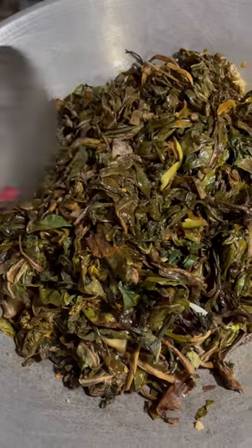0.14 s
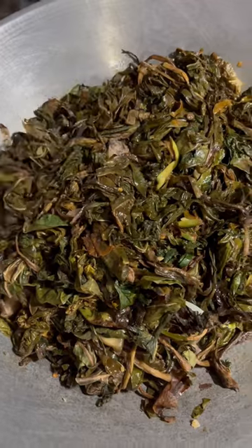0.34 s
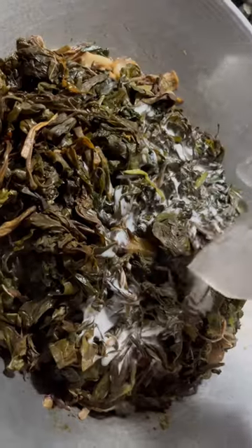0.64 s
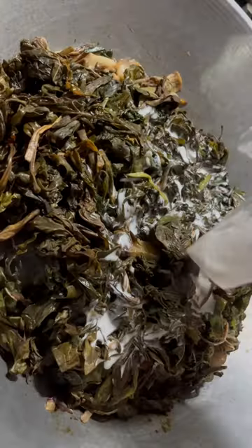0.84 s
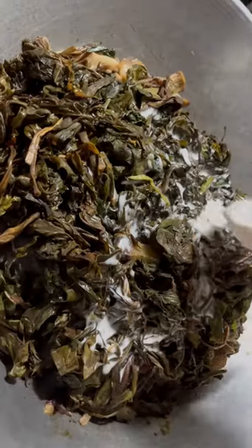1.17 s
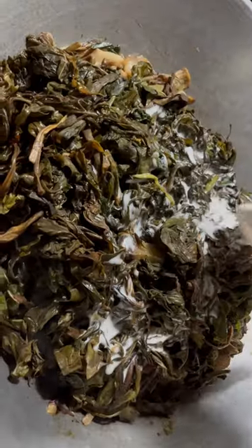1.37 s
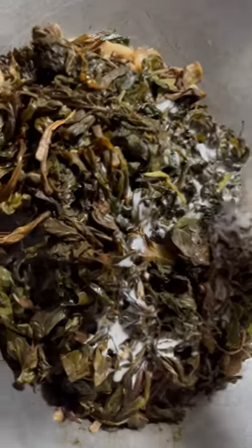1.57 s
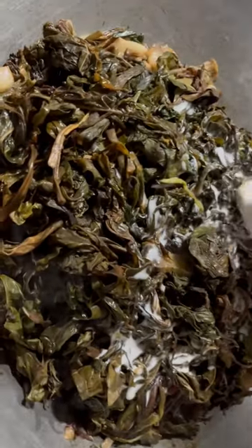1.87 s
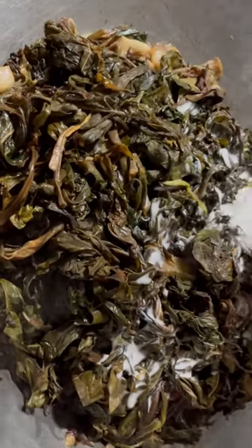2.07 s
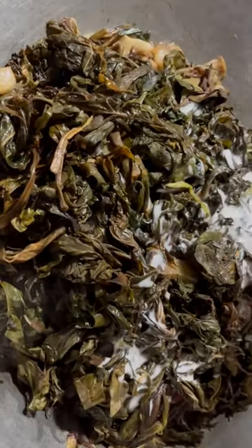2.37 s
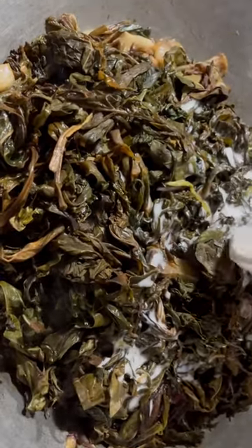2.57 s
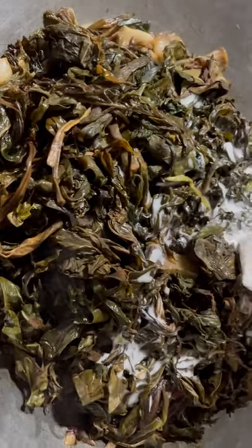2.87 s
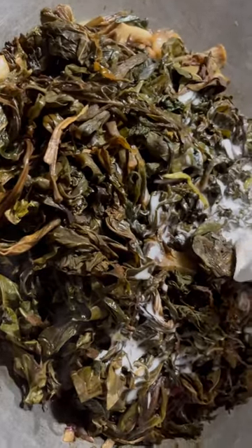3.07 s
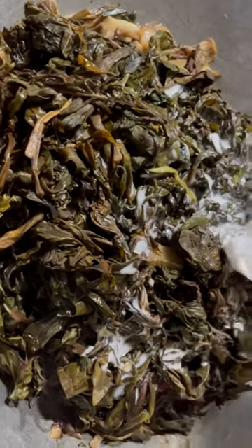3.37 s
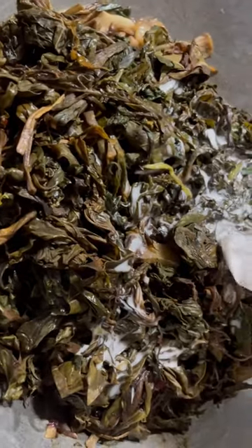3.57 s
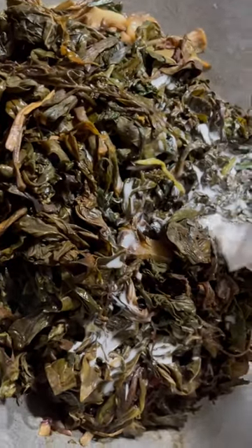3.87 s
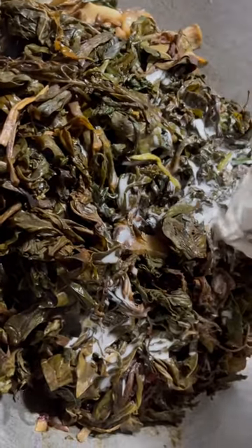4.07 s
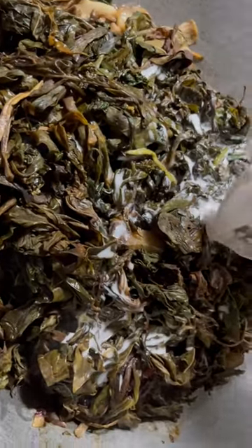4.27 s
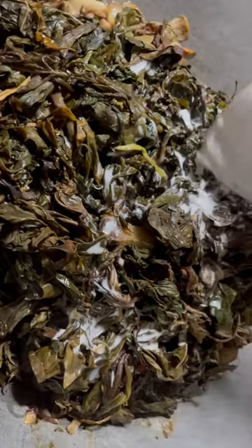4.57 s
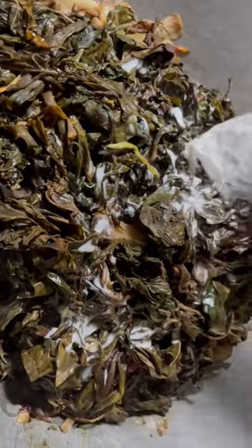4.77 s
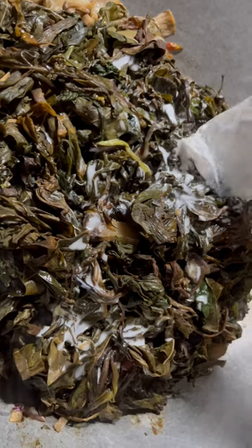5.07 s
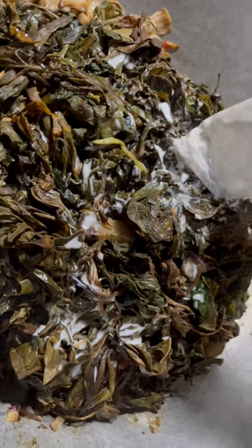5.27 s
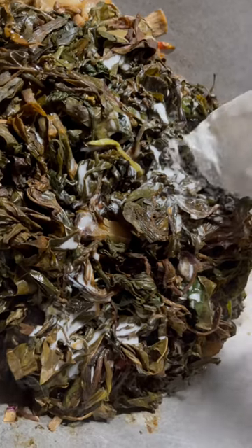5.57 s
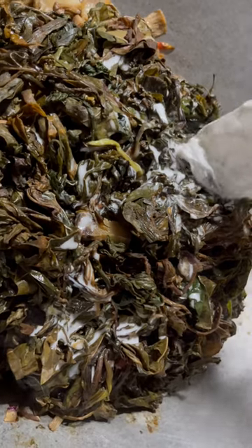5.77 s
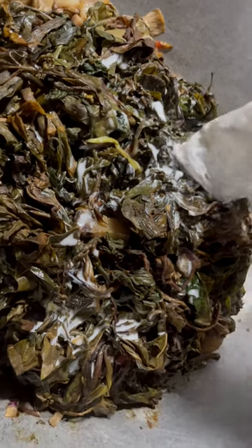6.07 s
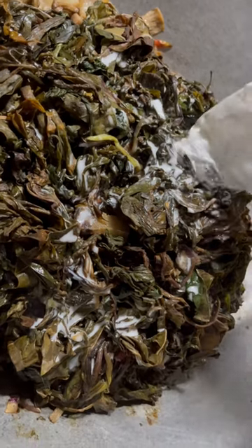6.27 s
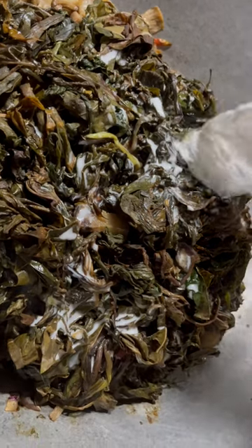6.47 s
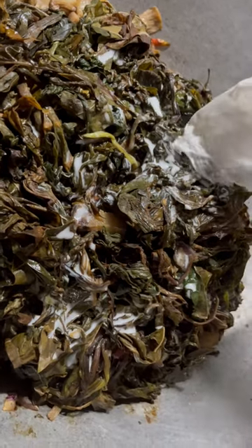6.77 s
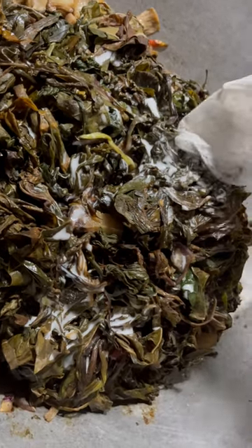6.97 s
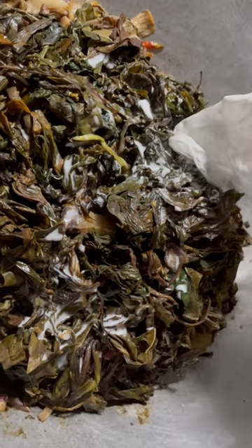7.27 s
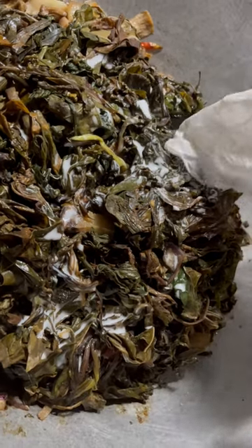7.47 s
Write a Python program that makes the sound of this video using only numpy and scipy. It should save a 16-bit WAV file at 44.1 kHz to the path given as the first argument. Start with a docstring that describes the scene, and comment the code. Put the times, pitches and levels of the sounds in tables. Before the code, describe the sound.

Chopped wet greens fry in a metal pan, close below one microphone in a quiet kitchen, equal in both channels. From 0 to 7.6 s a bright, mostly high sizzle continues: fine fizz, snapping bubbles, faint tiny ringing tones and smooth hiss, peppered with sharp dry oil spits. Very faint low rumble and mains hum lie beneath. Near 0.1 s the pan bumps softly with a faint utensil touch; a firmer touch and thud follow at 0.64 s. Low, soft bumps come around 2.1 and 2.5 s. The bubbling flares briefly near 0.9, 3.1, 3.6, 3.9 and 4.8 s, with short dips near 2.1 and 5 s. After a dull bump at 4.7 s, a short tap comes at 5.3 s and another bump at 6 s. The loudest, damped metallic double knock lands at 6.7 s, a faint touch at 7.3 s, and the frying ends slightly weaker, still going.

```python
"""Chopped greens fry in a metal pan in a quiet kitchen, one microphone close above, for 7.6 s.
From the start tiny bubbles fizz, larger ones snap and faint short tones shimmer over hiss, low rumble
and mains hum, made from random clicks, noise and sines; oil spits, band-limited pulses, run throughout.
Soft pan bumps and light utensil touches, resonated noise, begin within the first tenth of a second.
The frying flares and sinks briefly and ends a little weaker; the loudest touch comes near 6.7 s."""
import sys
import numpy as np
from scipy import signal
from scipy.fft import rfft, irfft
from scipy.io import wavfile
from scipy.ndimage import uniform_filter1d

SR = 44100
rng = np.random.default_rng(int(sys.argv[2]) if len(sys.argv) > 2 else 0)


def transcribe(u):
    """Save the signal u as a 16-bit wav file named by the first command-line argument.

    u: samples, shape (n,) or (channels, n), limited to [-1, 1]; the rate is SR.
    q: integer samples, one column per channel.
    """
    v = np.clip(np.atleast_2d(u).T, -1, 1)
    q = np.round(v * 32767).astype(np.int16)
    wavfile.write(sys.argv[1], SR, q)


N = 336483
TIME = np.arange(N) / SR  # seconds

# colour of the sizzle, relative density: pitch_hz, level_db (per Hz)
SIZZLE_COLOUR = [(200, -50.5), (500, -35.5), (800, -29), (1300, -24.5), (2000, -18), (2500, -16.5),
                 (3100, -11), (4100, -6), (5100, 0.5), (5800, 0.4), (6800, 2), (9500, 1.5), (11800, 2.5),
                 (15500, 0)]


def from_db(db):
    """Decibels to gain."""
    return 10 ** (np.asarray(db) / 20)


def rms_one(x):
    """Scale to unit rms."""
    return x / np.sqrt(np.mean(x ** 2) + 1e-20)


def drift(rate):
    """Smooth chance with spread 1 that changes about `rate` times a second."""
    step = 20  # samples between the slow random values
    r = np.exp(-2 * np.pi * rate * step / SR)
    noise = rng.standard_normal(N // step + 2002)
    slow = signal.lfilter([1], [1, -2 * r, r * r], noise)[2000:]  # drop the filter's start-up
    return np.interp(np.arange(N) / step, np.arange(len(slow)), rms_one(slow))


def colour(x, spectrum):
    """Causal (minimum-phase) filter with the given spectrum, so clicks stay sharp; rms 1."""
    size = 8192
    hz, level_db = np.transpose(spectrum)
    grid = np.maximum(np.arange(size // 2 + 1) * SR / size, 1)
    gain = from_db(np.interp(np.log(grid), np.log(hz), level_db))
    # folding the cepstrum forward in time gives minimum phase
    cepstrum = irfft(np.log(gain))
    cepstrum[1:size // 2] *= 2
    cepstrum[size // 2 + 1:] = 0
    impulse = irfft(np.exp(rfft(cepstrum)))
    return rms_one(signal.fftconvolve(x, impulse)[:N])


def resonate(x, hz, width_hz):
    """One resonance with gain 1 on top."""
    r = np.exp(-np.pi * width_hz / SR)
    feed = np.array([1, 0, -1]) * (1 - r * r) / 2
    back = [1, -2 * r * np.cos(2 * np.pi * hz / SR), r * r]
    return signal.lfilter(feed, back, x + 1e-18)


def cut(x, hz, kind, order=2):
    """Butterworth low- or high-pass."""
    sos = signal.butter(order, min(hz, .45 * SR), kind, fs=SR, output="sos")
    return signal.sosfilt(sos, x + 1e-18)


def swells(rows):
    """Smooth bell-shaped changes of level, in dB over time."""
    return sum(db * np.exp(-(2 * (TIME - s) / length) ** 2) for s, length, db in rows)


def flurries(rate, depth_db):
    """Wet spots flare up and die within hundredths of a second; the local mean rate stays put."""
    flare = from_db(depth_db * drift(rate))
    return flare / uniform_filter1d(flare, size=SR // 9)


def bursts(per_s, spread_db, limit):
    """Bubbles burst at random moments: many small, few large."""
    sizes = from_db(spread_db * np.minimum(rng.exponential(1, N), limit))
    return sizes * (rng.random(N) < per_s / SR)


def fizz(flurry, per_s, cycles, count=20):
    """Tiny bubbles of all sizes, ringing briefly at their own pitch; per_s is the rate at 8 kHz."""
    out = 0
    for k, hz in enumerate(np.geomspace(600, 16000, count)):
        clicks = bursts(per_s * hz / 8000 * flurry, spread_db=1.0, limit=4.5)
        ringing = rms_one(resonate(clicks, hz, hz / cycles))
        out = out + (-1) ** k * np.sqrt(hz) * ringing
    return colour(out, SIZZLE_COLOUR)


def crackle(flurry, per_s):
    """Larger bubbles snap open: single sharp pressure pulses."""
    snaps = bursts(per_s * flurry, spread_db=2.5, limit=4.6)
    return colour(cut(snaps, 230, "high"), SIZZLE_COLOUR)


def shimmer(per_s, cycles, spread_db, count=6000):
    """Short faint tones at random pitches, each rising slightly and dying in hundredths of a second."""
    out = np.zeros(N + 2048)
    age = np.arange(2048) / SR
    for when, pitch, weakness, damping in rng.random((count, 4))[:int(per_s * N / SR)]:
        hz = 1200 + 14500 * pitch
        life = min(cycles * (.5 + damping) / hz, .012)  # decay time in s, at most 12 ms
        rise = 1 + 0.0014 * np.minimum(age / life, 6)
        tone = np.sin(2 * np.pi * hz * age * rise) * np.exp(-age / life)
        level = from_db(-spread_db * np.log(max(weakness, .03))) / np.sqrt(life)
        at = int(when * N)
        out[at:at + len(age)] += level * tone
    return colour(out[:N], SIZZLE_COLOUR)


def hiss():
    """The bursts under the leaves and their echoes from the walls merge into a smooth hiss."""
    return colour(rng.standard_normal(N), SIZZLE_COLOUR)


def sizzle():
    """All four layers follow the frying; flares lift mostly the coarse bubbling below 4 kHz."""
    # how hard the pan fries; it eases as the greens dry: time_s, level_db
    frying_level = [(0, 0.5), (1.1, -0.3), (1.7, -0.6), (2.3, -0.4), (3.1, -0.8), (4.1, 0), (5.1, -1),
                    (6.2, -1.5), (6.8, -0.6), (7.63, -1.2)]
    # juice reaches the hot metal and the bubbling flares up: centre_s, length_s, rise_db
    flares = [(0.67, 0.026, 1), (0.88, 0.043, 2.5), (3.08, 0.045, 2.5), (3.57, 0.11, 2.3), (3.9, 0.11, 2),
              (4.8, 0.052, 3.5), (6.9, 0.052, 2), (7.3, 0.11, 1.5)]
    # the sizzle sinks briefly: centre_s, length_s, drop_db
    lulls = [(0.6, 0.045, 2.5), (1.6, 0.14, 0.5), (2.12, 0.053, 2.7), (3.3, .12, 1), (5.0, 0.086, 1.5),
             (6.99, 0.081, 1)]
    fine_db, coarse_db = -24.5, -40  # rms before frying level and flares
    fine_share = 0.27  # share of a flare's rise, in dB, that the fine sizzle takes

    waver_db = 0.02 * drift(9)
    vigour_db = np.interp(TIME, *np.transpose(frying_level)) + waver_db - swells(lulls)
    flare_db = swells(flares)
    flurry = flurries(rate=60, depth_db=2.0)

    oil = from_db(-7.0) * fizz(flurry, per_s=600, cycles=4.7)
    oil = oil + from_db(-7.0) * crackle(flurry, per_s=2000)
    oil = oil + from_db(-11.5) * shimmer(per_s=280, cycles=126, spread_db=2.0)
    oil = oil + from_db(-4.5) * hiss()

    # forward then backward, so the split shifts nothing in time
    forward = cut(oil, 4000, "low", order=4)
    coarse = cut(forward[::-1], 4000, "low", order=4)[::-1]
    fine = from_db(fine_db + fine_share * flare_db) * rms_one(oil - coarse)
    bubbling_db = coarse_db + flare_db + 0.44 * drift(7)  # a little less steady than the fine part
    bubbling = from_db(bubbling_db) * rms_one(coarse)
    return from_db(vigour_db) * (fine + bubbling)


def pan_ring(frying):
    """The bursts keep the pan's own modes faintly ringing."""
    # thin ring of the pan under the boiling: pitch_hz, width_hz, level_db (rms)
    ring_modes = [(456, 8.1, -84), (673, 5.3, -78), (775, 3, -77), (5380, 22, -56)]
    flat = colour(frying, [(hz, -db) for hz, db in SIZZLE_COLOUR])  # undo the sizzle's colour
    return sum(from_db(db) * rms_one(resonate(flat, hz, width)) for hz, width, db in ring_modes)


def kitchen():
    """Faint, uneven room rumble and mains hum."""
    # colour of the rumble, relative density: pitch_hz, level_db (per Hz)
    room_tone = [(20, -7), (40, -5), (70, 0.5), (110, 0), (170, 3), (300, 1.5), (500, -1.5), (1000, -18),
                 (3000, -41)]
    # level of the low rumble: time_s, level_db (rms)
    rumble_level = [(0, -68), (0.45, -73), (0.9, -66), (1.3, -73), (2.7, -70), (3.1, -74.5), (3.9, -70),
                    (5.05, -73.5), (7.63, -73)]
    hum_hz, hum_db = 59.5, -84.5  # hum level is rms
    level_db = np.interp(TIME, *np.transpose(rumble_level)) + 1.2 * drift(8.9)
    rumble = from_db(level_db) * colour(rng.standard_normal(N), room_tone)
    hum = from_db(hum_db) * np.sqrt(2) * np.sin(2 * np.pi * hum_hz * TIME)
    return rumble + hum


def stray_spits(per_s, top_db, range_db, count=600):
    """More drops burst at random, the weak ones most often: rows of start_s, peak_db, pitch_hz."""
    when, weak, pitch = rng.random((count, 3))[:int(per_s * N / SR)].T
    peak_db = top_db - range_db * np.sqrt(weak)
    return np.transpose([when * N / SR, peak_db, 6800 + 5700 * pitch])


def spits(rows):
    """A bursting drop is one pulse; the small source radiates no bass, and larger drops sound lower."""
    size = 256
    out = np.zeros(N + size)
    for s, peak_db, hz in rows:
        bassless = cut(signal.unit_impulse(size), .48 * hz, "high", order=3)
        pulse = cut(bassless, 1.45 * hz, "low")
        at = int(s * SR)
        out[at:at + size] += from_db(peak_db) * pulse / np.abs(pulse).max()
    return out[:N]


def contact(start, t60, rise_s):
    """A gritty push that swells quickly and dies away."""
    age = np.maximum(TIME - start, 0)
    swell = 1 - np.exp(-age / rise_s)
    return rng.standard_normal(N) * swell * from_db(-60 * np.minimum(age / t60, 4))


def bumps(width_hz, t60):
    """Dull, low thuds as the pan shifts."""
    # soft bumps of the pan: start_s, level_db (relative, before the overall gain), pitch_hz
    bump_rows = [(0.065, -66, 310), (0.638, -69, 227), (2.055, -67, 180), (2.545, -67, 195),
                 (4.72, -72, 200), (5.99, -69, 200), (6.71, -68, 190)]
    thuds = sum(from_db(db) * resonate(contact(s, t60, rise_s=0.0054), hz, width_hz)
                for s, db, hz in bump_rows)
    return from_db(26.0) * cut(thuds, 870, "low")


def utensil():
    """Each touch rings the pan briefly; the greens damp it."""
    # utensil touches: start_s, level_db (relative, before the overall gain), t60_s
    touches = [(0.085, -53, 0.17), (0.642, -46, 0.17), (5.34, -47, .1), (6.701, -39, 0.25),
               (6.735, -47, 0.17), (7.305, -54, .08)]
    # modes of the food-damped pan: pitch_hz, width_hz, level_db (relative)
    pan_modes = [(330, 370, -17), (760, 47, -6), (1010, 88, 1), (1240, 150, -6), (1520, 57, 6.5),
                 (2110, 170, 2.5), (2260, 300, -1), (3030, 640, -5)]
    push = sum(from_db(db) * contact(s, t60, rise_s=0.00074) for s, db, t60 in touches)
    ring = sum((-1) ** k * from_db(db) * resonate(push, hz, width)
               for k, (hz, width, db) in enumerate(pan_modes))
    return from_db(14.5) * ring


def scene():
    """One microphone above the pan feeds both channels alike."""
    # oil spits at set moments, most of them loud: start_s, peak_db, pitch_hz
    set_spits = [(0.1735, -6, 8400), (0.6728, -5, 9600), (1.3442, -4, 11700), (2.0679, -5, 11900),
                 (2.2283, -5, 9900), (2.4661, -4, 12000), (3.0827, -7, 6400), (3.5491, -5, 9500),
                 (3.586, -6, 9000), (3.9046, -6, 8800), (3.9206, -5, 6300), (4.4756, -6, 9100),
                 (4.9293, -6, 6200), (4.9537, -7, 5200), (5.0495, -6, 10700), (5.1842, -5, 7100),
                 (5.8186, -4, 10000), (7.307, -10, 5000)]
    frying = sizzle()
    drops = spits(set_spits) + spits(stray_spits(per_s=50, top_db=-6.5, range_db=7))
    knocks = bumps(width_hz=190, t60=0.27) + utensil()
    mono = frying + pan_ring(frying) + kitchen() + drops + knocks
    return np.array([mono, mono])


def record(dry):
    """The top is cut steeply at 15.55 kHz by a linear-phase low-pass."""
    taps = signal.firwin(601, 15550, window=("kaiser", 9), fs=SR)
    return signal.fftconvolve(dry, taps[None], mode="same", axes=1)


dry = scene()
out = record(dry)
transcribe(out)
```